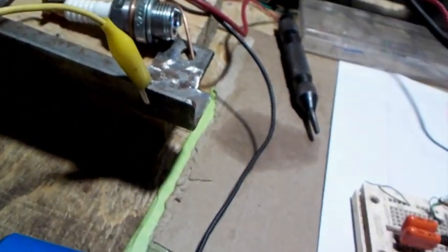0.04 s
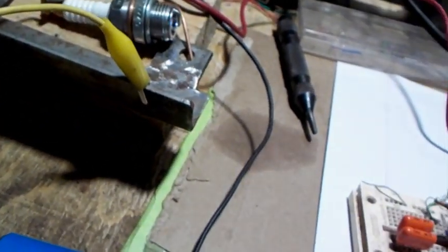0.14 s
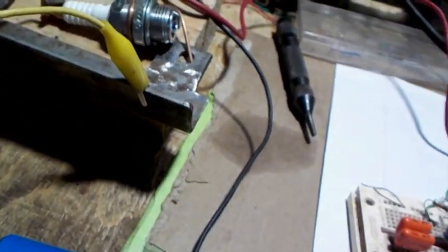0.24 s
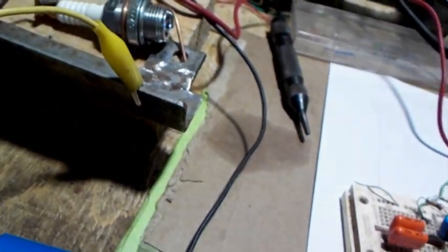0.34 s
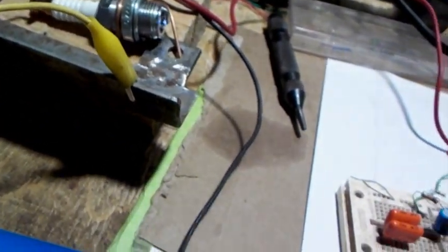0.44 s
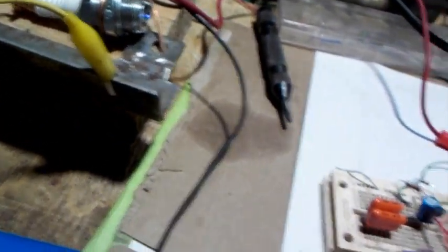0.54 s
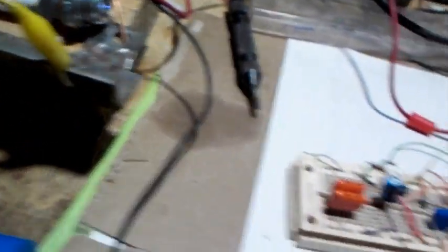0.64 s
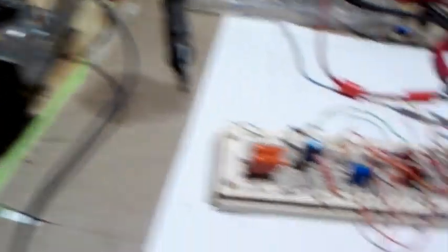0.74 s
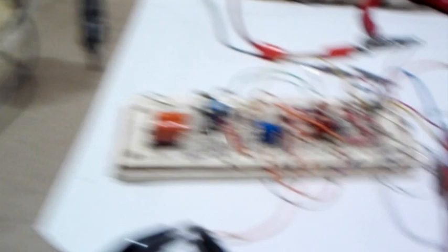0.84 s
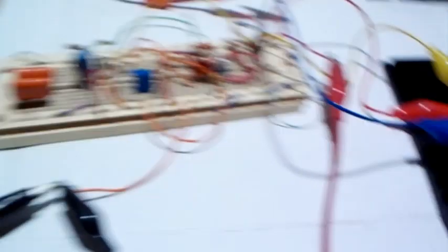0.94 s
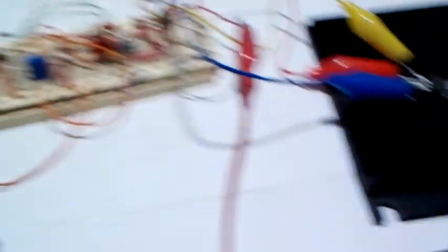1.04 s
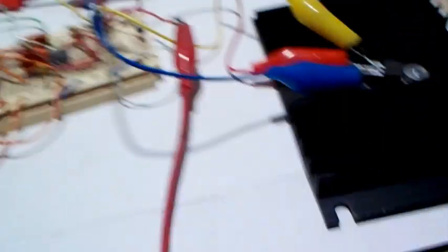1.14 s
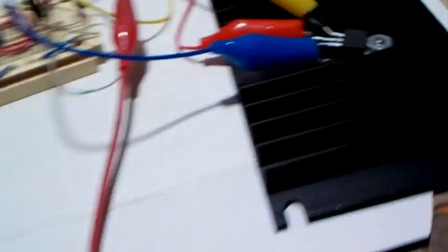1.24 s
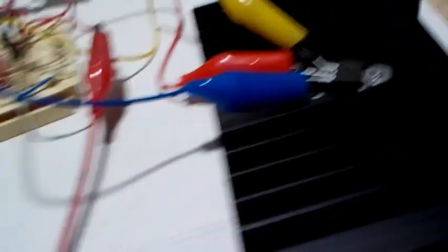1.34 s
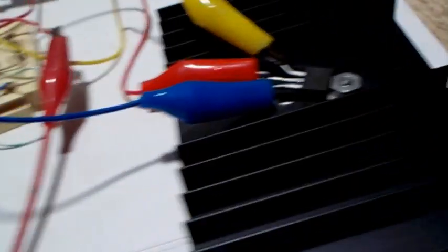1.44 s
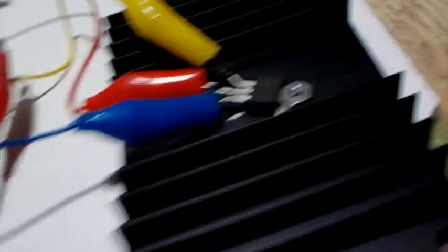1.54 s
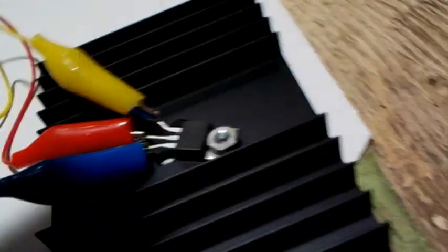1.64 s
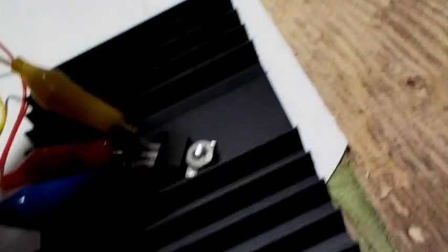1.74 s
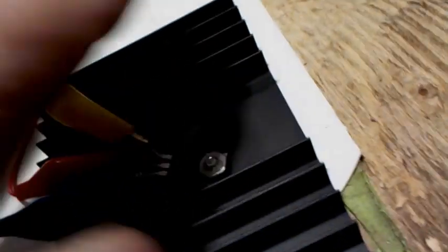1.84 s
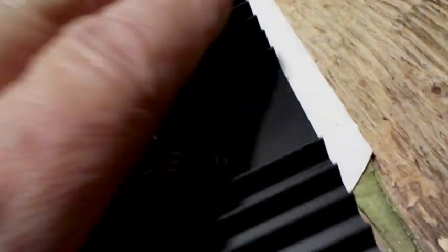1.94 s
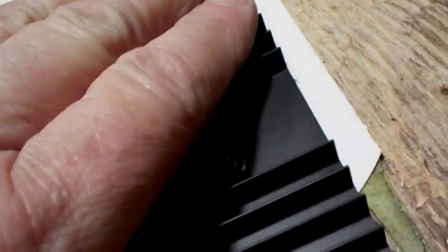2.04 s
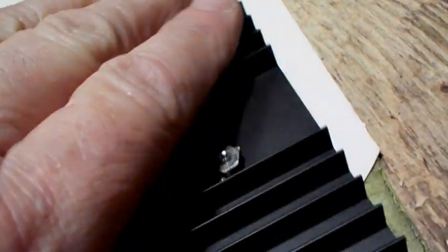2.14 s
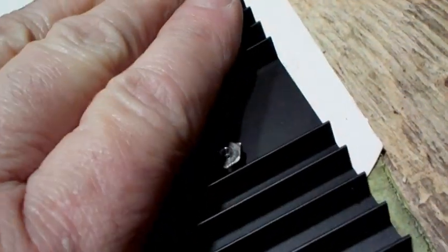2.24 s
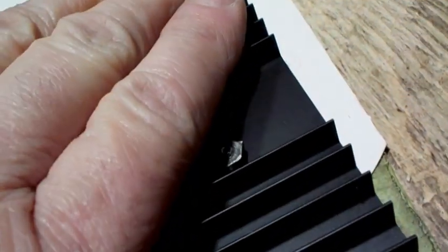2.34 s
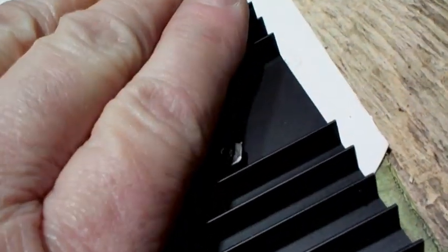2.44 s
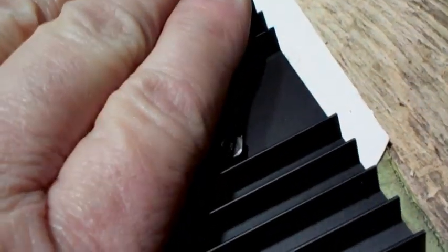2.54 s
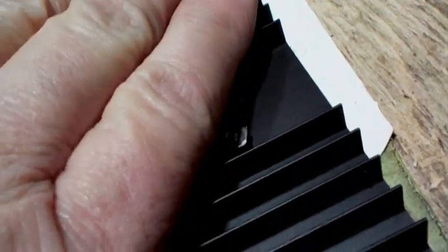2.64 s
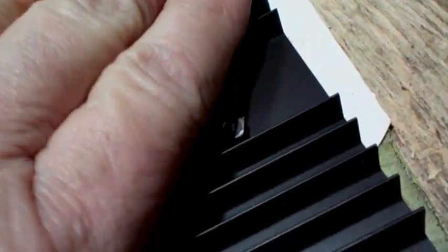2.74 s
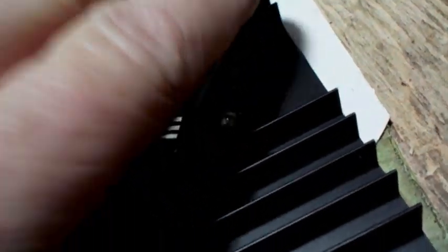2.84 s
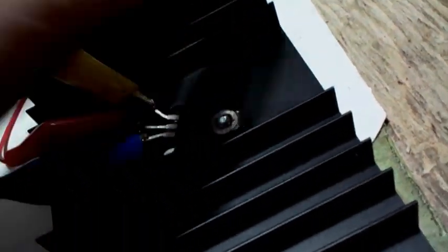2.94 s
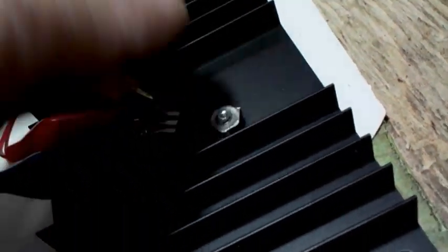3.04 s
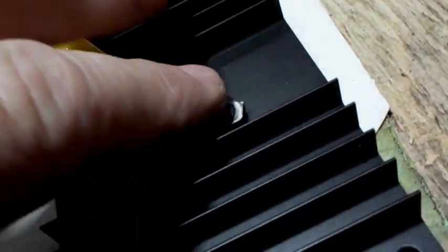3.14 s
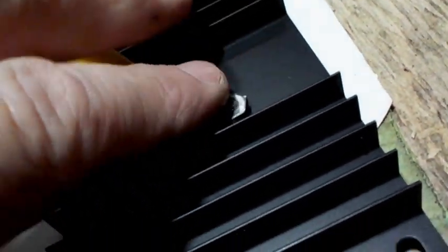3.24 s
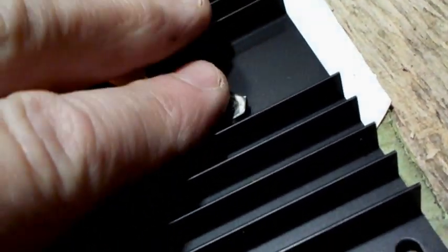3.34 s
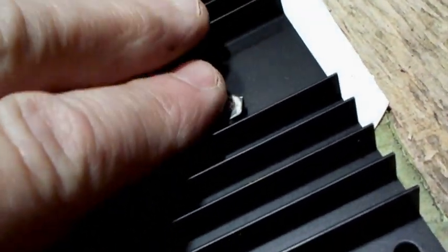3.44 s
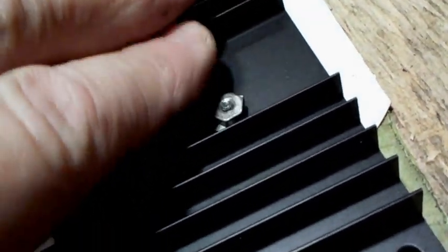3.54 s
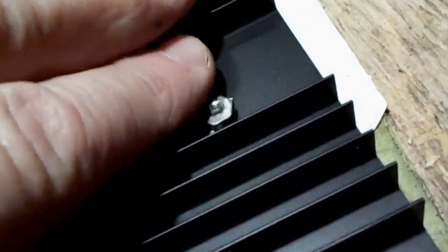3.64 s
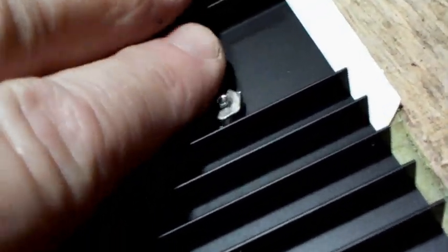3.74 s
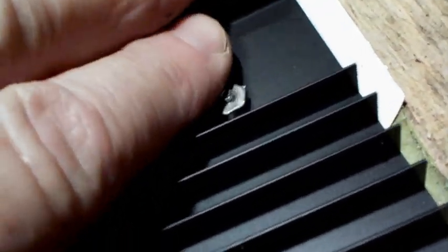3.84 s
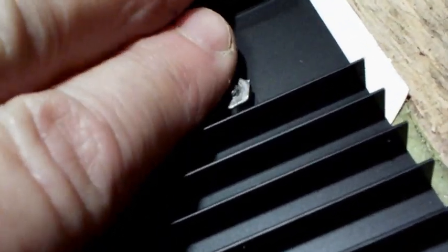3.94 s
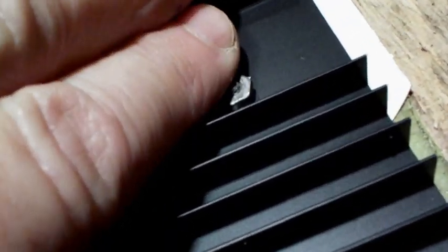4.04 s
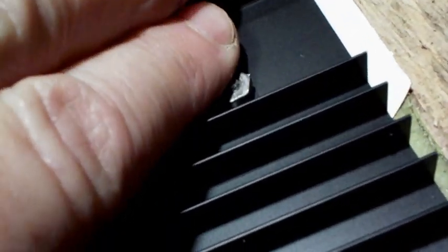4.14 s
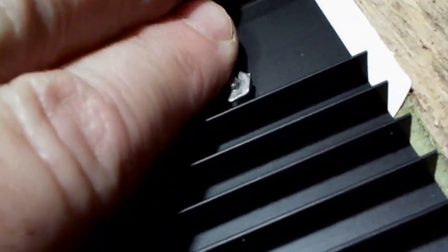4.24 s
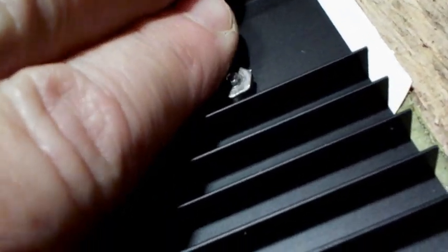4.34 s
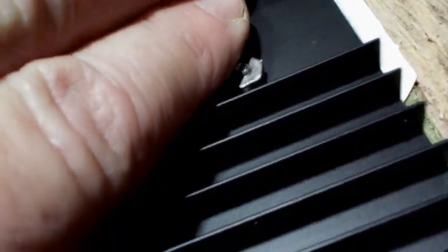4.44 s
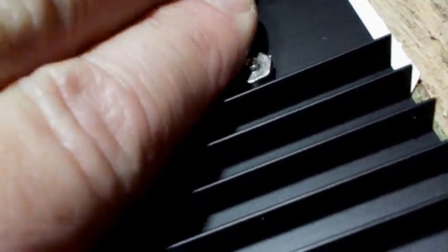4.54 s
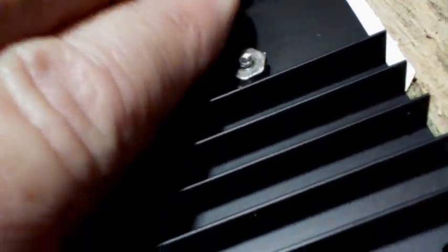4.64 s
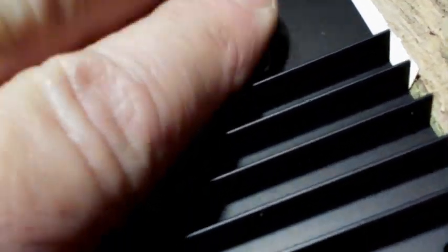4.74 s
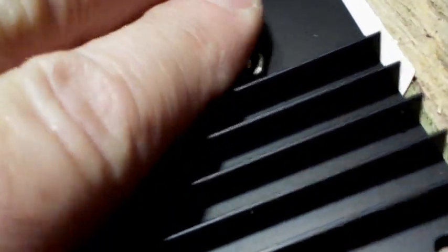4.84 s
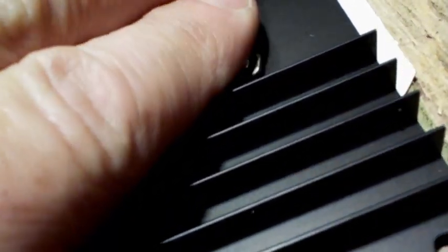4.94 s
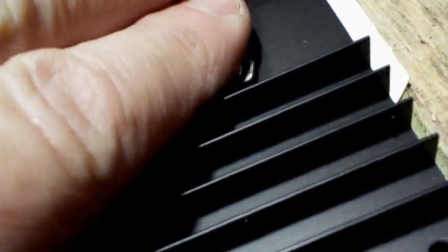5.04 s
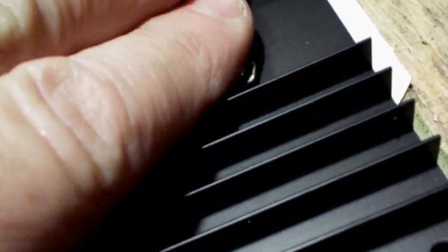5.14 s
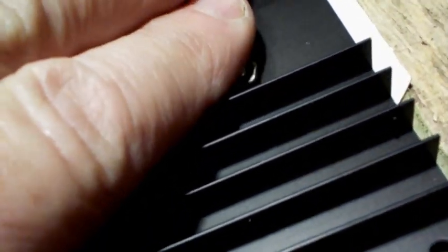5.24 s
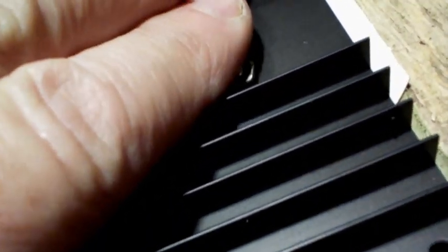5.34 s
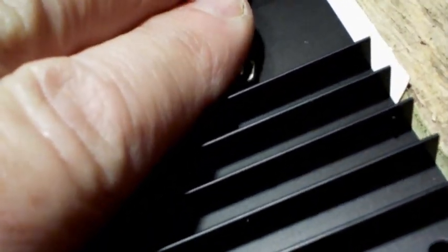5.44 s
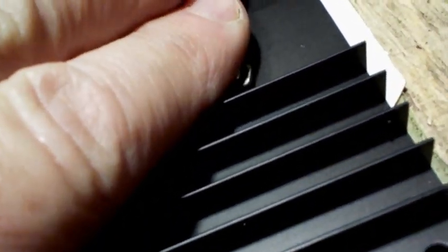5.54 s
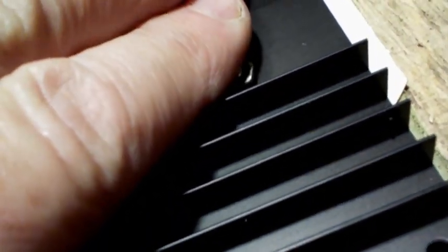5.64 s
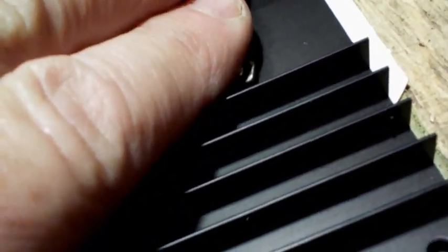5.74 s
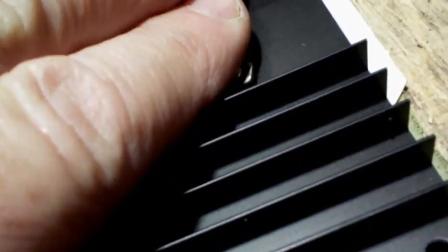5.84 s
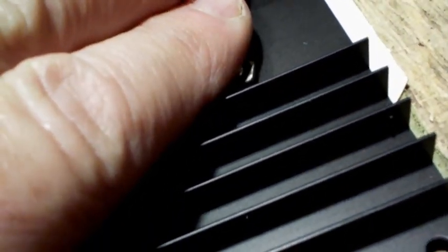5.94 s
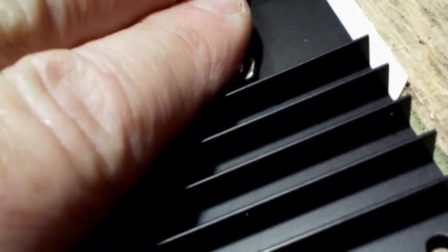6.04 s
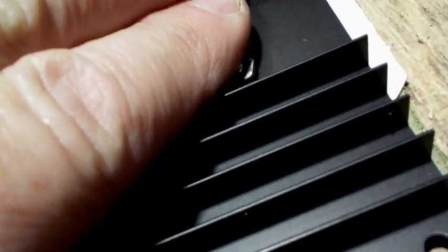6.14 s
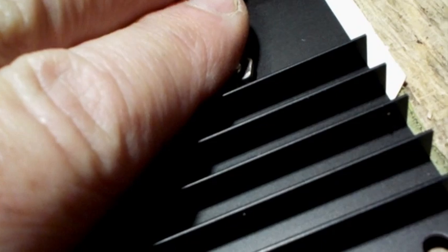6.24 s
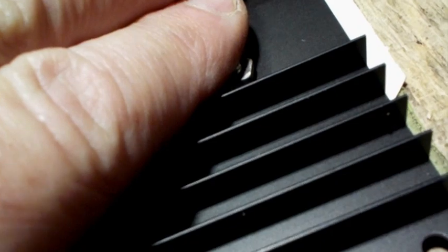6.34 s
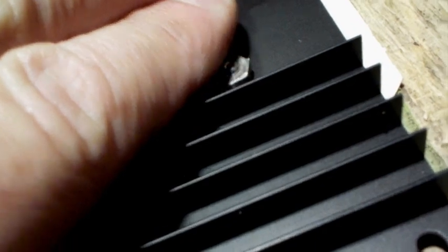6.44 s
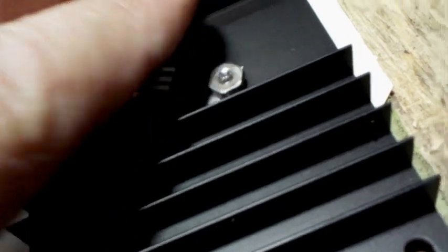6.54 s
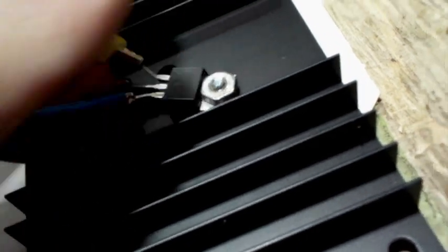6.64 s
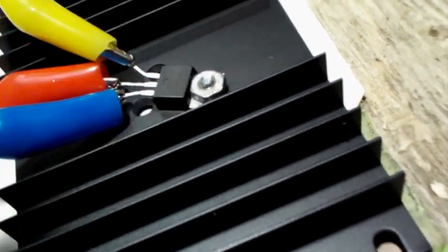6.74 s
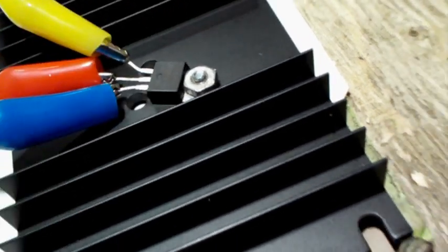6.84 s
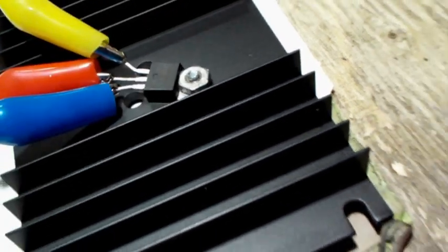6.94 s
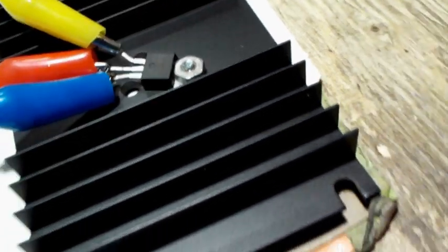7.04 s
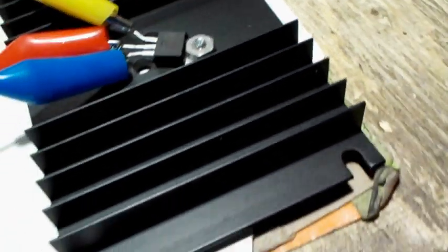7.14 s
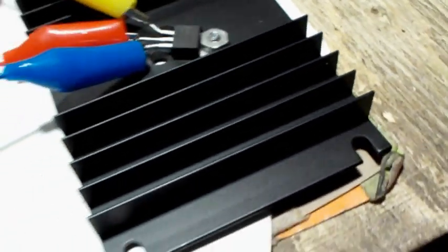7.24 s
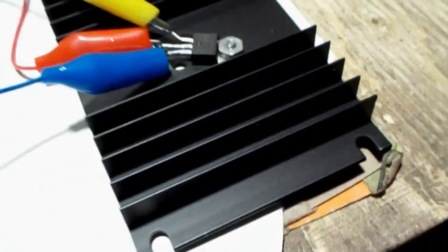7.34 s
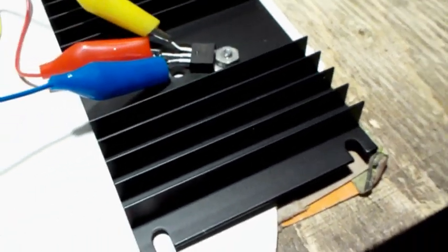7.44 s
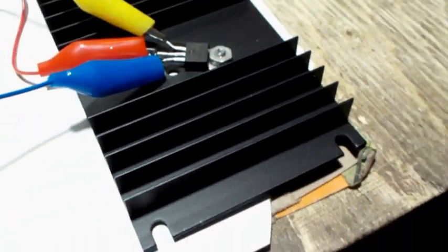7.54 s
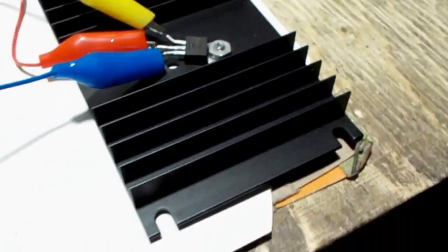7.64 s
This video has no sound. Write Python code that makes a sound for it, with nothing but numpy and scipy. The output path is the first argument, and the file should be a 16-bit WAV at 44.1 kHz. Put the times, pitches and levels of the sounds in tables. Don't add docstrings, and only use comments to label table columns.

```python
import sys
import numpy as np
from scipy import signal
from scipy.fft import rfft, irfft, next_fast_len
from scipy.io import wavfile
from scipy.ndimage import uniform_filter1d, map_coordinates

SR = 44100
rng = np.random.default_rng(int(sys.argv[2]) if len(sys.argv) > 2 else 0)


def digitize_waveform(pressure):
    field = np.atleast_2d(pressure).T
    bounded = np.clip(field, -1, 1)
    quanta = np.round(bounded * 32767).astype(np.int16)
    wavfile.write(sys.argv[1], SR, quanta)


def makeup_ratio(level_db):
    decades = np.asarray(level_db, float) / 20
    return 10 ** decades


N = 340003
TAIL_SAMPLES = 16384

# time_s, sparks_per_s
SPARK_RATE = [(0, 3198), (.4, 3188), (.75, 3205), (.87, 3165), (1.7, 3182), (2.6, 3158), (3.2, 3168),
              (4.2, 3140), (4.7, 3157), (5.4, 3141), (6.4, 3148), (7.1, 3168), (7.7, 3190)]
# start_s, length_s
HOPS = [(.95, .21), (1.44, .1), (2.1, .33), (2.77, .2), (3.3, .36), (4.95, .18), (5.8, .08), (6.1, .23),
        (6.99, .07), (7.47, .08)]
HOP_RATE_HZ, HOP_EDGE_S, HOP_WHISTLE_DB = 3222, .03, -5
# centre_s, length_s, depth_db
MISFIRES = [(.153, .011, -12), (.477, .014, -14), (.53, .011, -13), (.593, .008, -10), (.879, .015, -14),
            (.985, .011, -13), (1.363, .011, -11), (2.175, .01, -9), (7.561, .01, -9)]
WHISTLE_DB = [4.5, 3, 1.9]
# centre_s, half_length_s, level_db
GLINT = (7.41, 0.092, 6)
# time_s, gain_db, whistle_db
NEARNESS = [(0, 6.5, 0.5), (.5, 7.5, -1.3), (.85, 4.5, 1.4), (1.1, 3.5, 5.5), (1.45, 6, -3.5),
            (1.67, 2.5, 1), (1.75, -3, 1), (2.0, -1, -2.5), (2.4, -0.4, -1), (3.0, -1.4, 1), (3.5, -4.5, 3),
            (4.05, -0.4, -1.8), (5.4, -1.04, 1.7), (6.3, -1, 1), (6.8, -3.5, 5.2), (7.22, 2.5, -1.3),
            (7.4, 1.5, 2.3), (7.7, 2.8, -4.5)]
FOLLOWS = [0.75, 1.044, 0.96, 1.58, 0.97, 0.99]

# centre_s, length_s
TURNS = [
    (0.946, 0.21),
    (1.74, 0.085),
    (3.645, 0.53),
    (6.927, 0.18),
]
# low_db, middle_db, high_db, overtone_1_db, overtone_2_db, overtone_3_db
PLACE_DB = [
    [-52.5, -43, -67.5, -60, -46, -62.5],
    [-53.5, -45.5, -67, -59.5, -43.5, -67],
    [-51, -44.5, -68, -57, -54.5, -61],
    [-51, -44, -70, -57, -54.5, -69.5],
    [-51.5, -46.5, -69.5, -59, -53, -68],
]
# centre_hz, width_hz, level_db
LOW_MODES = [
    [(1960, 100, -5), (2220, 26, -7)],
    [(1290, 53, -12), (1970, 69, -4)],
    [(1116, 380, -15), (1870, 73, -2.5)],
    [(1117, 100, -14), (1893, 90, 1)],
    [(1140, 50, -15), (2130, 620, -5.5)],
]
# centre_hz, width_hz, level_db
MIDDLE_MODES = [
    [(3950, 95, -5.5), (4790, 39, 2.5), (4800, 35, -21), (5150, 37, -0.5), (5365, 100, 4)],
    [(3920, 31, -11), (4640, 540, -3.5), (5410, 200, 0.5)],
    [(4000, 94, -20), (5000, 770, -6.5), (5070, 100, -23)],
    [(3940, 45, -44), (4110, 63, -12), (4713, 120, 1.5), (5156, 49, -5), (5450, 60, -4.5)],
    [(3680, 99, -17), (4755, 150, 1.5), (5220, 46, -2), (5580, 32, -1), (6030, 43, 0)],
]
# freq_hz, left_lead_rad
LEAD = [
    [(0, -0.0064), (2760, -0.33), (4740, -0.1), (5680, -0.42), (6800, -0.16), (9300, 1), (9910, -0.18),
     (10900, 0.54), (12000, -2.3)],
    [(0, -4), (3100, 0.86), (3790, -1.5), (4310, 0.5), (6030, 0.6), (8180, -0.5), (8700, 1.5), (11000, 2),
     (12000, 2.5)],
    [(0, -5.5), (2840, -1), (4050, 1), (6550, 2.5), (7150, -2.5), (7750, -12.5), (9470, -7.5), (10800, 0.5),
     (12000, -18)],
    [(0, 6.5), (2580, -1.03), (4910, 1.15), (5170, 1), (6800, 3), (7580, -3), (9820, 5.5), (11000, -4.5),
     (12000, -2.5)],
    [(0, 5.5), (2580, -1.3), (4480, 1), (5170, 0.9), (6550, 4.5), (7840, -3.5), (8350, -5.5), (11000, -4.5),
     (12000, -2)],
]
# freq_hz, left_minus_right_db
TILT = [
    [(600, -0.5), (3000, 2.5), (5400, 3.5), (6300, 8), (7200, 14), (9500, 6.5), (12000, 7)],
    [(600, -1), (3000, 0), (5000, 1.5), (6400, 6), (7300, 5), (9000, 5.5), (11500, 0.5)],
    [(600, -0.5), (3000, 0.5), (5000, -6), (6400, 3.5), (7600, 6), (9500, 0.5), (12000, 0.5)],
    [(600, 0), (3000, -1.5), (5000, -4.5), (6400, 3), (7400, -4), (8800, -2), (12000, 0)],
    [(600, -0.5), (3500, -0.5), (5000, -5.5), (6300, -2.5), (7600, 7), (9000, -2.5), (11000, -1)],
]
SHOULDER_DB = [-3.5, -11, -6, -11, -11]
NEAR_DB = [-6, -3, 0, 0, -1]
# freq_hz, level_db
ECHO = [(100, -1), (300, -6), (1500, -11.5), (3000, -6), (6000, -3.5), (10000, 3)]
ECHO_EVEN_HZ = 160
# freq_hz, level_db
LOW_BED = [(100, -33), (180, -32.5), (300, -21.5), (450, -13), (1000, -11), (1600, -8.5), (2250, -7.5),
           (2500, -39)]
# freq_hz, level_db
MIDDLE_BED = [(2300, -39), (2550, -9.5), (2850, -15), (3100, -14.5), (3600, -18.5), (4300, -13),
              (4700, -2.5), (5500, -10), (6400, 0.5), (6900, -14), (7600, -16), (7950, -39), (8300, -85)]
# freq_hz, level_db
HIGH_BED = [(7700, -97), (8050, 1), (9000, -2), (9500, 0), (10400, -8.5), (11200, -7.5), (12000, -2.5),
            (12200, -114)]

# start_s, end_s, level_db
GRIP = (0.99, 1.71, -65.5)
# peak_s, level_db
RUBS = [
    (1.34, -48),
    (1.655, -48.5),
]
RUB_RISE_DB_PER_S, RUB_FALL_DB_PER_S = 144, 370
# start_s, thud_db, click_re_thud_db, tick_re_thud_db, t60_s
KNOCKS = [(1.2797, -23, -4, -2, .005), (1.284, -27, -20, -40, .006), (1.3355, -17, -13, -40, .006),
          (1.354, -25, -22, -40, .008), (1.504, -37, -20, -40, .005), (1.608, -24, -12, -40, .006),
          (1.6565, -26, -22, -40, .005), (1.668, -34, -6, -8, .004)]
# centre_hz, width_hz, level_db
CASING = [
    [(70.4, 33, 3), (540, 490, 0.5), (1090, 730, 1)],
    [(3600, 270, 15), (5200, 1100, 0)],
    [(10200, 4400, 4)],
]
# freq_hz, level_db_rms
HUM = [(240, -78), (360, -79), (400, -75), (480, -77), (560, -74), (720, -74), (840, -76)]
# centre_hz, width_hz, depth_db
NOTCHES = [(2400, 330, -70), (2980, 90, -11), (8030, 600, -70)]


def unit(x):
    return x / np.sqrt(np.mean(x ** 2) + 1e-20)


def along(points, hz):
    f, v = np.transpose(points)
    return np.interp(np.log(hz + 1), np.log(f + 1), v)


def curves(rows):
    s, *cols = np.transpose(rows)
    return [np.interp(np.arange(N) / SR, s, c) for c in cols]


def wobble(rate_hz):
    return map_coordinates(rng.standard_normal(N // 16), [np.arange(N) * rate_hz / SR])


def filtered(x, response):
    m = next_fast_len(N + 8192)
    return irfft(rfft(x, m) * response(np.fft.rfftfreq(m, 1 / SR)), m)[..., :N]


def places():
    t = np.arange(N) / SR
    passed = [np.clip((t - s) / length + .5, 0, 1) for s, length in TURNS]
    return np.sqrt(np.abs(np.diff([np.ones(N), *passed, np.zeros(N)], axis=0)))


def ports(place, f, t60_s):
    t = np.arange(TAIL_SAMPLES // 2) / SR
    tails = rng.standard_normal((2, len(t))) * makeup_ratio(-60 * t / t60_s)
    echoes = rfft(tails / np.linalg.norm(tails[0]), 2 * len(f) - 2)
    bench = 1 + makeup_ratio(along(ECHO, f) + NEAR_DB[place]) * echoes
    local_power = uniform_filter1d(np.abs(bench) ** 2, size=round(ECHO_EVEN_HZ / f[1]), axis=1)
    bench = bench / np.sqrt(np.abs(local_power) + .01)
    left = makeup_ratio(along(TILT[place], f) / 2) * np.exp(.5j * along(LEAD[place], f))
    return np.array([left, 1 / left]) * bench


def heard_from(place, layers):
    m = 2 * next_fast_len(layers.shape[1] // 2 + TAIL_SAMPLES)
    f = np.fft.rfftfreq(m, 1 / SR)

    def rings(modes):
        return sum(makeup_ratio(db) / (1 + ((f - c) / max(w, 135) * 1.88) ** 4) for c, w, db in modes)

    low = makeup_ratio(along(LOW_BED, f)) + rings(LOW_MODES[place])
    middle = makeup_ratio(along(MIDDLE_BED, f)) + rings(MIDDLE_MODES[place])
    shade = makeup_ratio(SHOULDER_DB[place] / (1 + ((f - 8400) / 450) ** 4))
    high = makeup_ratio(along(HIGH_BED, f)) * shade
    path = ports(place, f, t60_s=.06)
    both = np.abs(path.mean(axis=0))
    total = 0
    for s, colour in zip(rfft(layers, m), [low, middle, high, 1, 1, 1]):
        total = total + s * colour * np.linalg.norm(s) / np.linalg.norm(s * colour * both)
    return irfft(total * path, m)


def patchy(x, depth_db):
    z = signal.stft(x, nperseg=512)[2]
    field = rng.standard_normal(z.shape[1:]) + 0.94 * rng.standard_normal(z.shape)
    field = uniform_filter1d(field, size=3, axis=1)
    field = uniform_filter1d(field, size=24, axis=2)
    return signal.istft(z * makeup_ratio(depth_db * unit(field)), nperseg=512)[1][:, :N]


def burning():
    t = np.arange(N) / SR
    gaps_db = sum(db * np.exp(-((t - s) / (length / 1.8)) ** 2) for s, length, db in MISFIRES)
    return makeup_ratio(gaps_db + 0.44 * wobble(12) + 0.3 * wobble(45))


def sizzle(fired, spiky_db):
    return unit((1.54 * fired + 0.79) * rng.standard_normal(N) * makeup_ratio(spiky_db * wobble(900)))


def arc():
    t = np.arange(N) / SR
    hopped = sum(np.clip(np.minimum(t - s, s + length - t) / HOP_EDGE_S + .5, 0, 1) for s, length in HOPS)
    rate_hz = curves(SPARK_RATE)[0] * (1 - hopped) + HOP_RATE_HZ * hopped
    jitter_hz = 11 * wobble(24) + 22 * (1 + .6 * hopped) * wobble(330)
    cycles = np.cumsum(rate_hz + jitter_hz) / SR
    fired = np.diff(np.floor(cycles), prepend=0) > 0
    strength = burning()
    near_db, steady_db = curves(NEARNESS)
    layers = [makeup_ratio(0.92) * sizzle(fired, spiky_db=0.5) * strength ** 0.35,
              makeup_ratio(0.5) * sizzle(fired, spiky_db=2.0) * strength,
              makeup_ratio(4.0) * sizzle(fired, spiky_db=1.0) * strength]
    regular = strength * makeup_ratio(-12 * np.clip(4 * (wobble(60) - 1.05), 0, 1))
    for k, db in enumerate(WHISTLE_DB):
        flutter_db = (0.38 + 0.51 * k) * wobble(110)
        level = makeup_ratio(db + HOP_WHISTLE_DB * hopped + steady_db + flutter_db)
        layers.append(level * regular * np.sin(2 * np.pi * (k + 1) * cycles))
    glint_s, half_s, glint_db = GLINT
    layers[4] = layers[4] * makeup_ratio(glint_db * np.exp(-((t - glint_s) / half_s) ** 2))
    layers = np.array(layers) * makeup_ratio(np.outer(FOLLOWS, near_db))
    out = np.zeros((2, N + 4 * TAIL_SAMPLES))
    for place, share in enumerate(places()):
        start, end = np.flatnonzero(share)[[0, -1]]
        shaded = makeup_ratio(np.array(PLACE_DB[place]))[:, None] * (layers * share)[:, start:end]
        sound = heard_from(place, shaded)[:, :end - start + TAIL_SAMPLES]
        out[:, start:start + sound.shape[1]] += sound
    return patchy(out[:, :N], depth_db=1.33)


def ringing(modes, f):
    total = 0
    for k, (c, w, db) in enumerate(modes):
        total = total + (-1) ** k * makeup_ratio(db) * 1j * f * w / (c * c - f * f + 1j * f * w + 1e-9)
    return total


def rustle():
    t = np.arange(N) / SR
    grains = rng.standard_normal((2, N)) + 3.3 * rng.standard_normal(N)
    rub = filtered(grains * makeup_ratio(3.9 * wobble(120)), lambda f: ringing(CASING[0][1:], f))
    slips = 0
    for s, db in RUBS:
        slips = slips + makeup_ratio(db - np.maximum(RUB_RISE_DB_PER_S * (s - t), RUB_FALL_DB_PER_S * (t - s)))
    start_s, end_s, grip_db = GRIP
    grip = makeup_ratio(grip_db) * np.clip(np.minimum(t - start_s, end_s - t) / .03, 0, 1)
    return unit(rub) * (slips + grip)


def knocks():
    blows = np.zeros((3, 2, N + 2048))
    t = np.arange(2048) / SR
    for s, db, click_db, tick_db, t60_s in KNOCKS:
        common, own = rng.standard_normal(len(t)), rng.standard_normal((2, len(t)))
        puff = (common + 0.62 * own) * makeup_ratio(-60 * t / max(t60_s, .002))
        level = makeup_ratio(db + np.array([4, click_db + 5.5, tick_db + 3.5]))
        start = round(s * SR)
        blows[:, :, start:start + len(t)] += level[:, None, None] * puff
    return sum(filtered(b[:, :N], lambda f: ringing(modes, f)) for b, modes in zip(blows, CASING))


def hum():
    t = np.arange(N) / SR
    near = np.linalg.norm(places()[2:], axis=0)
    total = 0
    for hz, db in HUM:
        level = makeup_ratio(db + 2.5 + 1.35 * wobble(6.8))
        total = total + level * np.sin(2 * np.pi * hz * t + 0.6 * wobble(8.3))
    return near * total


def scene():
    return arc() + rustle() + knocks() + hum()


def roll_off(x):
    return signal.sosfilt(signal.butter(12, 12440, fs=SR, output="sos"), x)


def record(dry):
    def response(f):
        notch = 1
        for c, w, db in NOTCHES:
            notch = notch * np.maximum(makeup_ratio(db), 1 / (1 + (w / 2 / (f - c + 1e-3)) ** 4))
        return notch * (f < 12100) / (1 + (165 / (f + 1)) ** 5)

    mix = filtered(dry, response)
    return roll_off(mix)


dry = scene()
out = record(dry)
digitize_waveform(out)
```